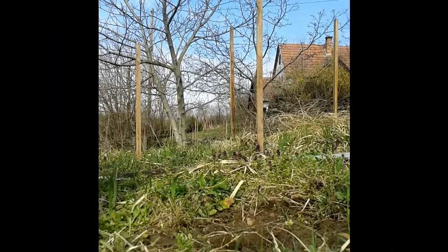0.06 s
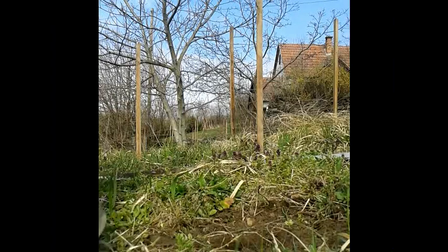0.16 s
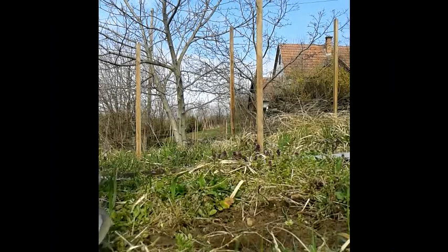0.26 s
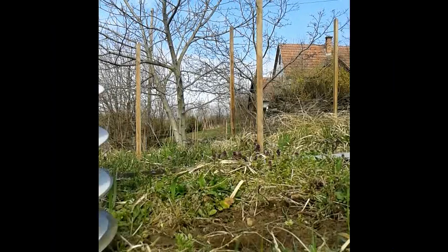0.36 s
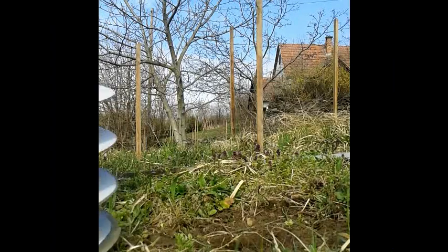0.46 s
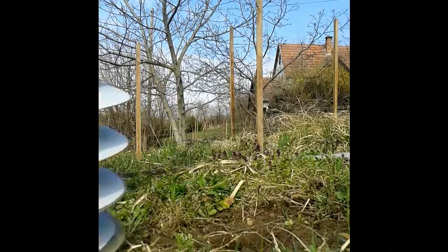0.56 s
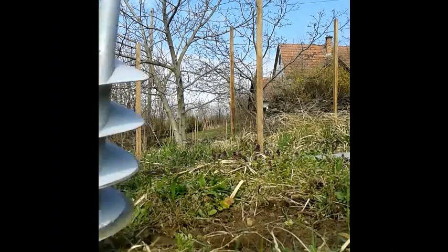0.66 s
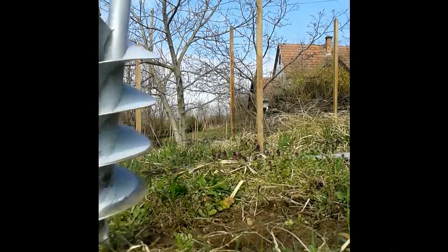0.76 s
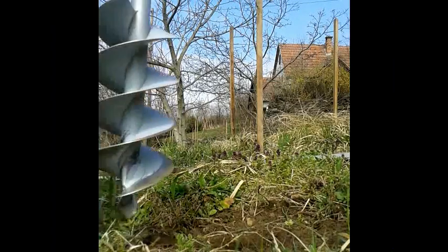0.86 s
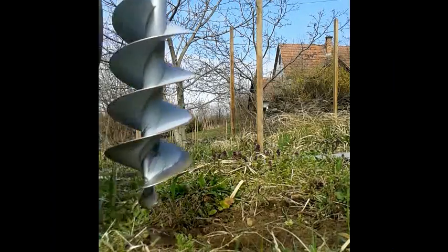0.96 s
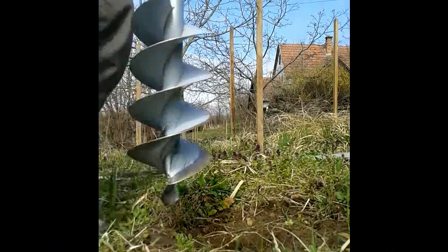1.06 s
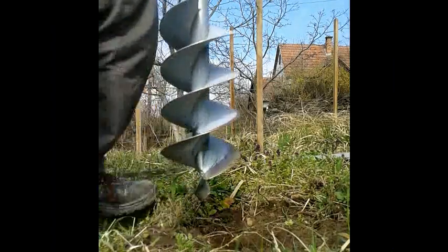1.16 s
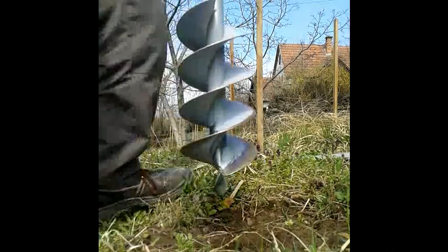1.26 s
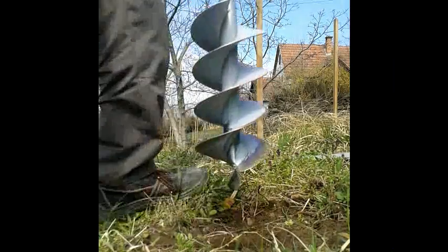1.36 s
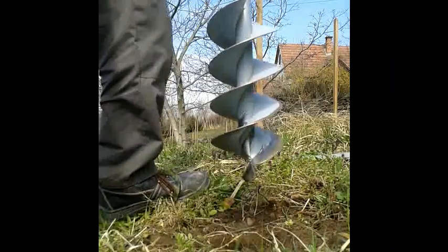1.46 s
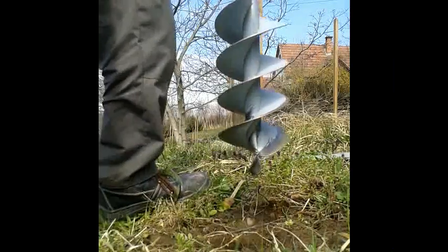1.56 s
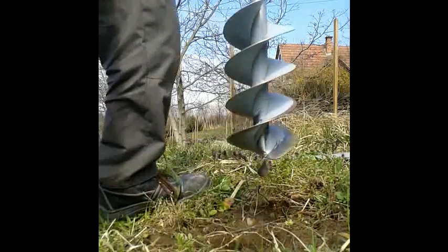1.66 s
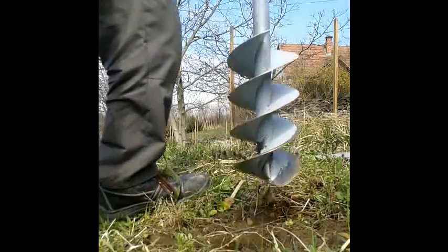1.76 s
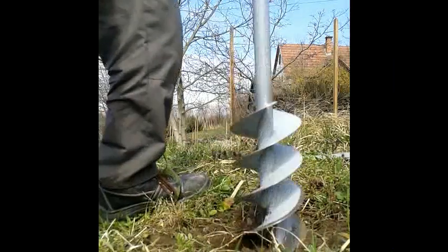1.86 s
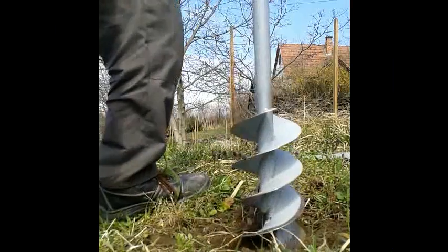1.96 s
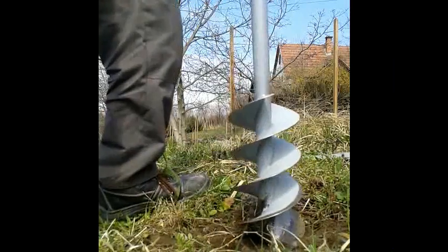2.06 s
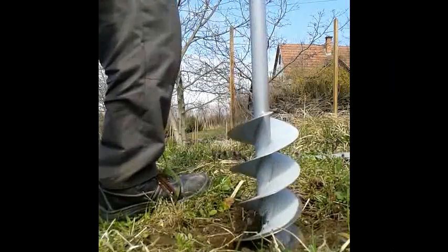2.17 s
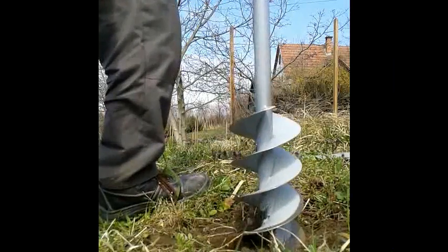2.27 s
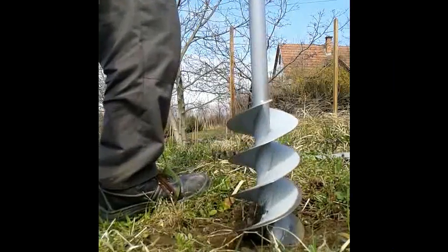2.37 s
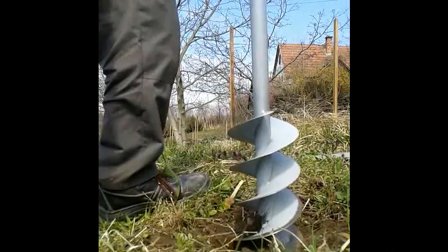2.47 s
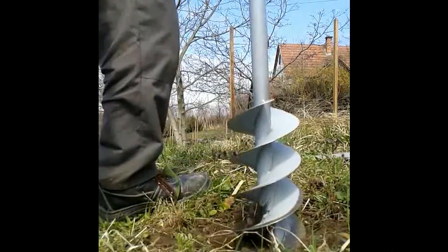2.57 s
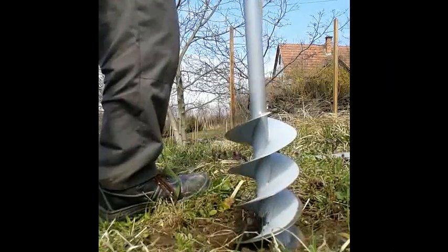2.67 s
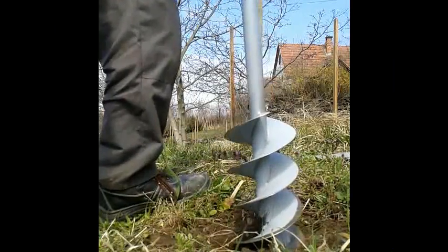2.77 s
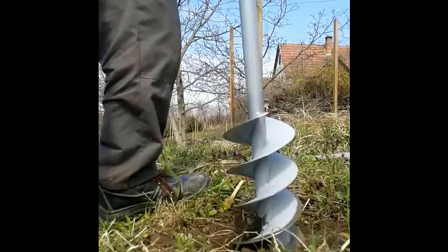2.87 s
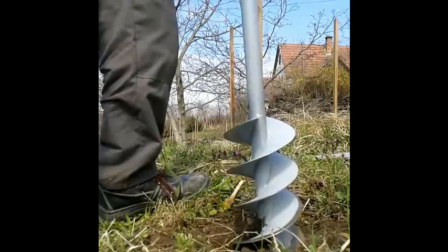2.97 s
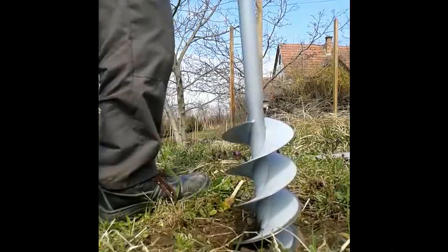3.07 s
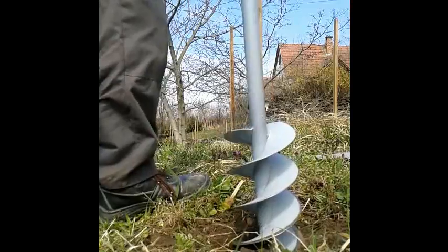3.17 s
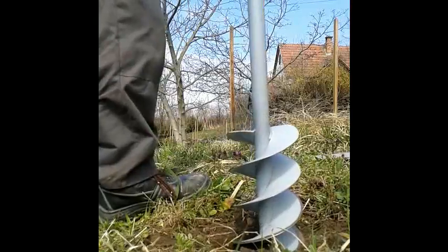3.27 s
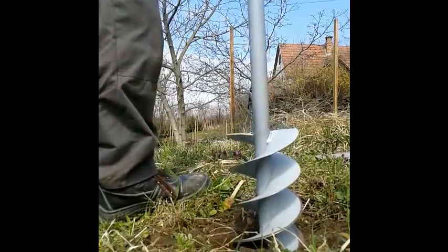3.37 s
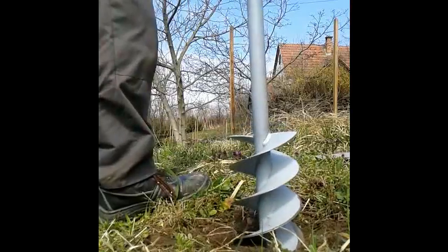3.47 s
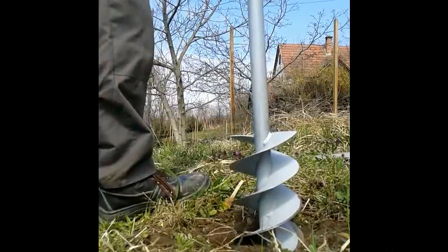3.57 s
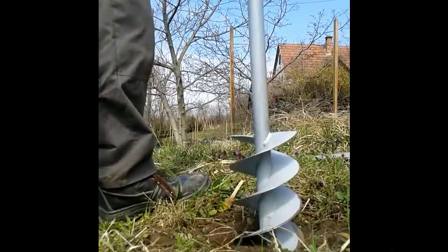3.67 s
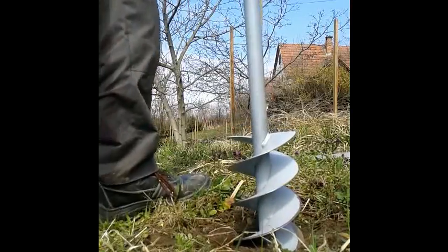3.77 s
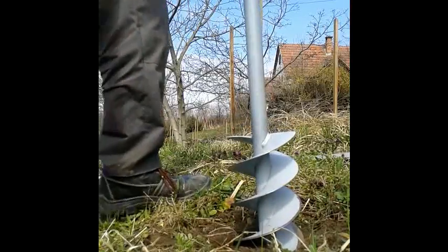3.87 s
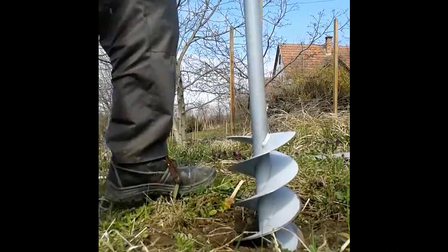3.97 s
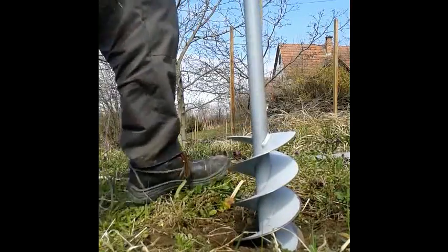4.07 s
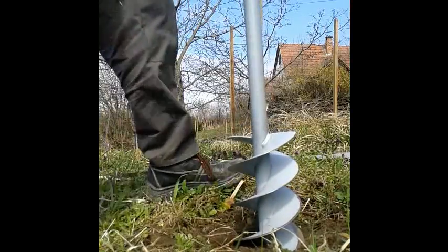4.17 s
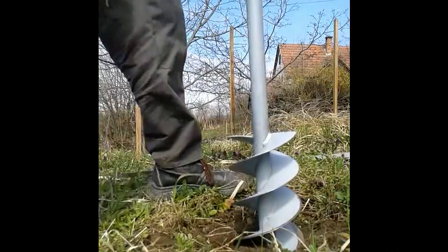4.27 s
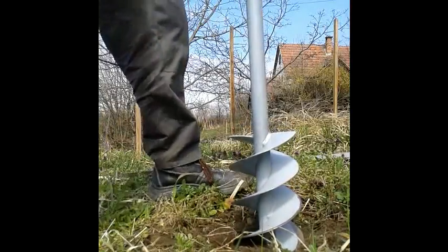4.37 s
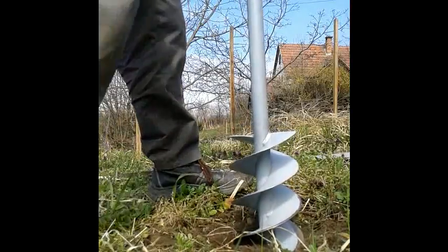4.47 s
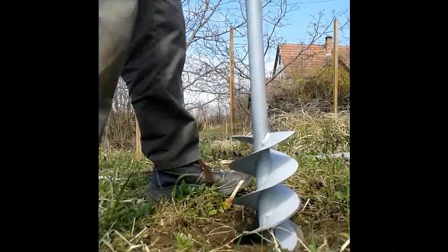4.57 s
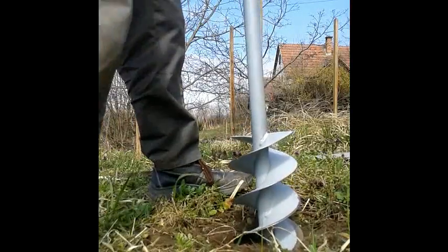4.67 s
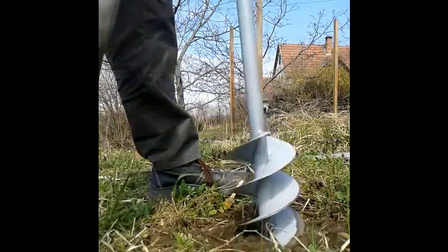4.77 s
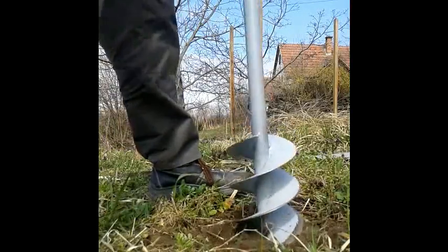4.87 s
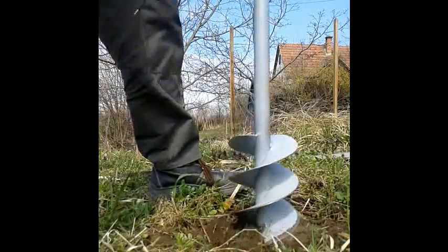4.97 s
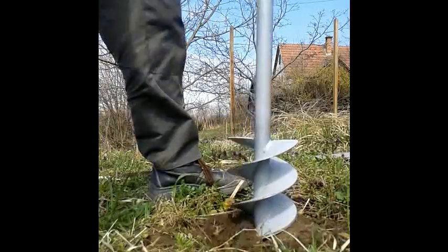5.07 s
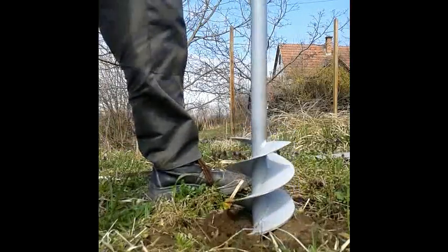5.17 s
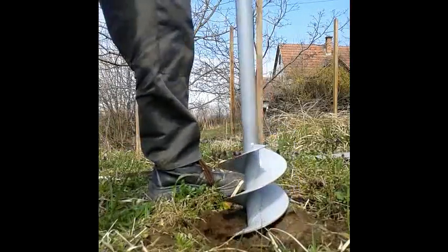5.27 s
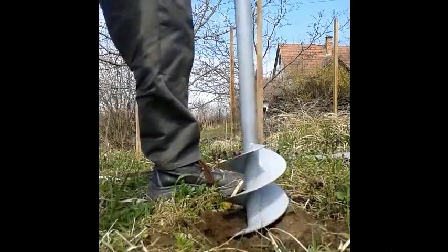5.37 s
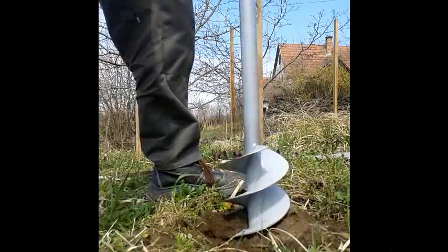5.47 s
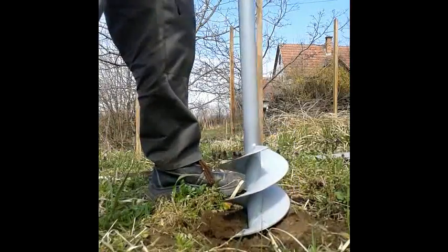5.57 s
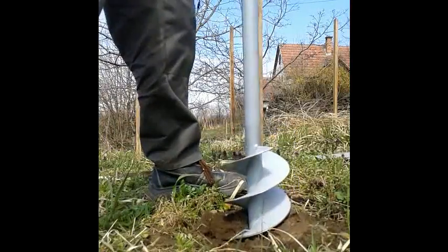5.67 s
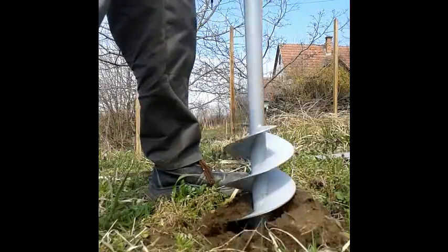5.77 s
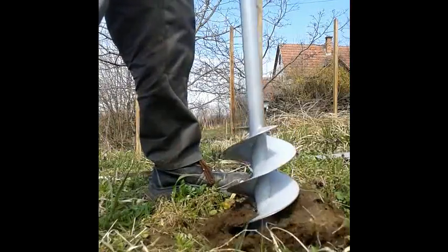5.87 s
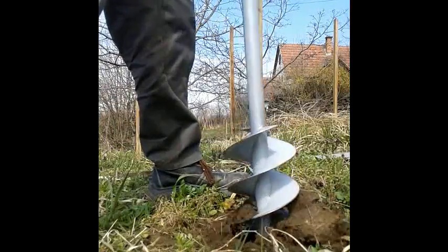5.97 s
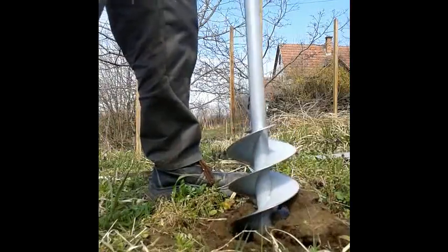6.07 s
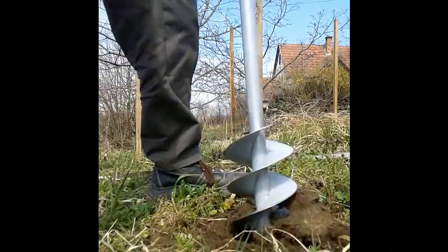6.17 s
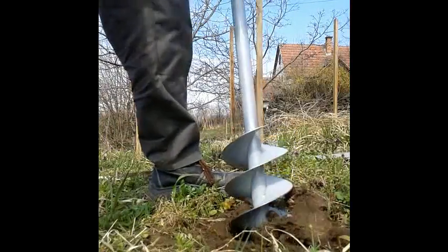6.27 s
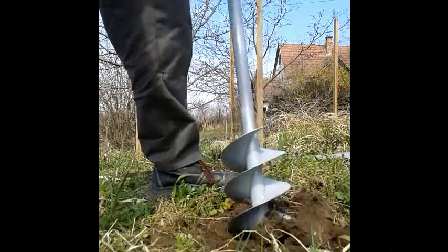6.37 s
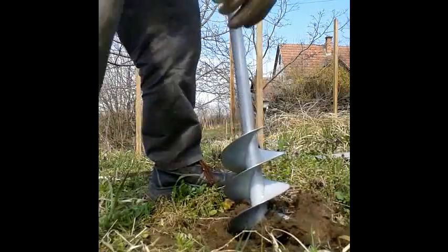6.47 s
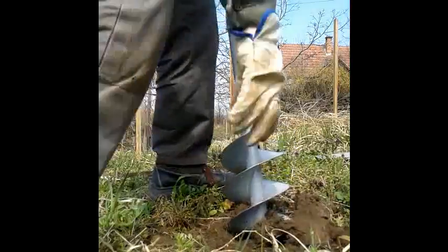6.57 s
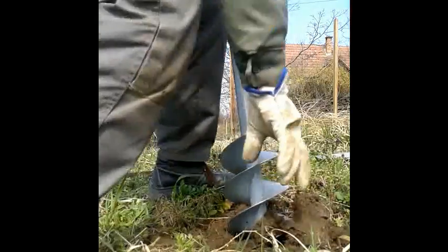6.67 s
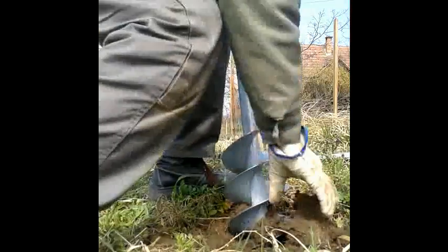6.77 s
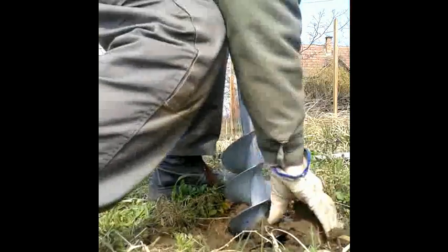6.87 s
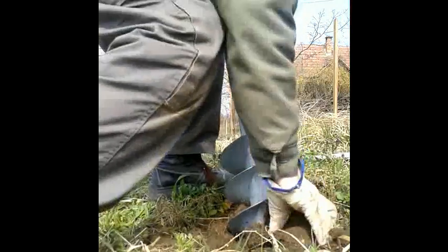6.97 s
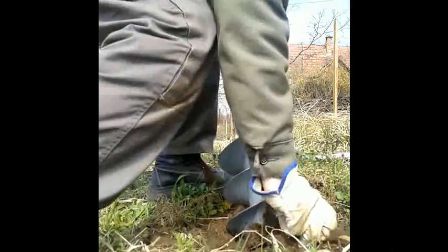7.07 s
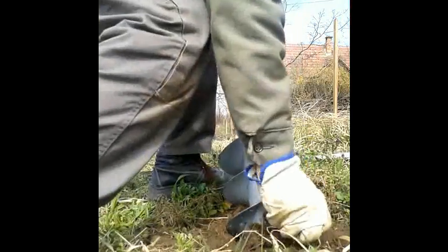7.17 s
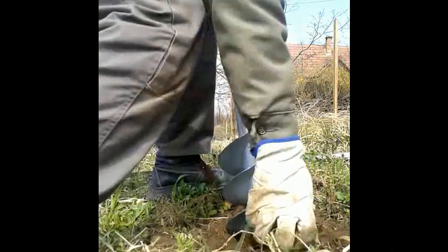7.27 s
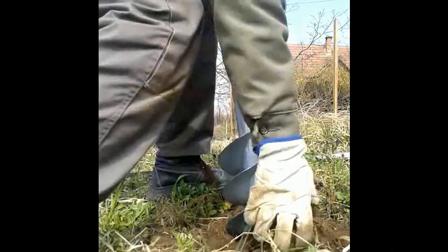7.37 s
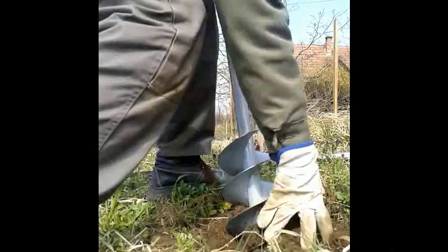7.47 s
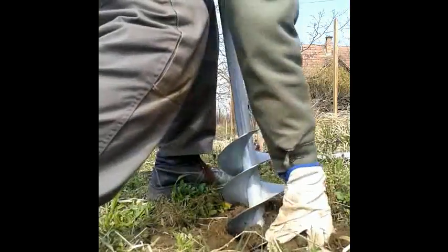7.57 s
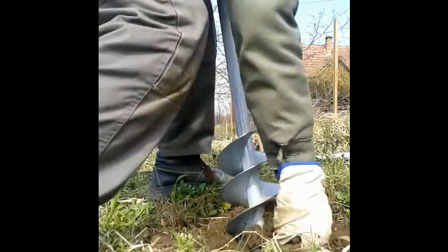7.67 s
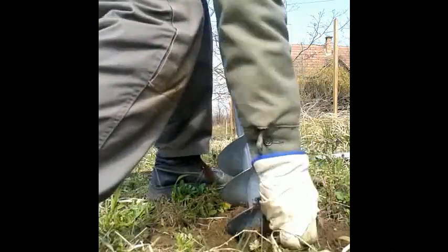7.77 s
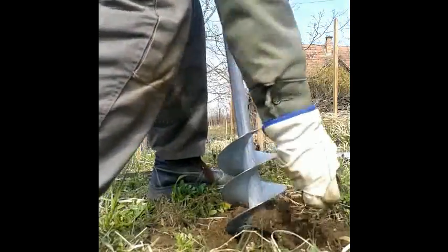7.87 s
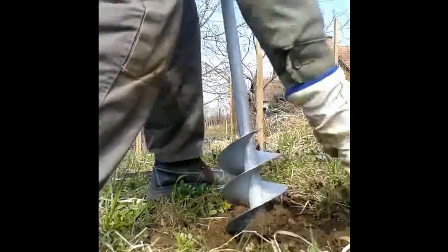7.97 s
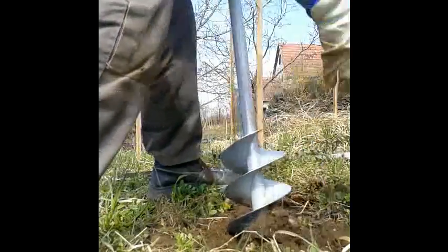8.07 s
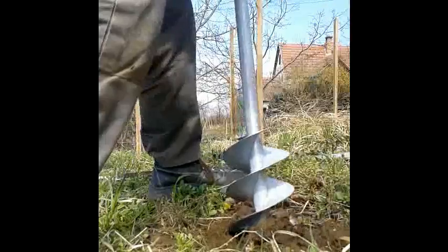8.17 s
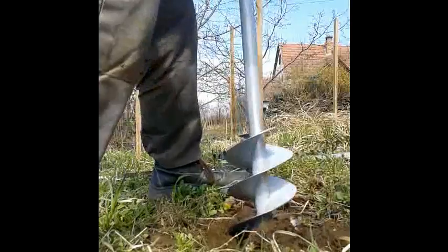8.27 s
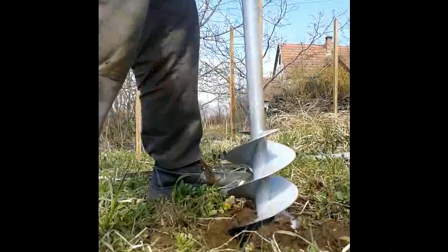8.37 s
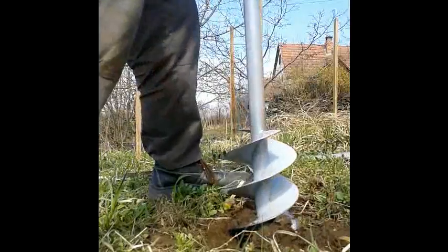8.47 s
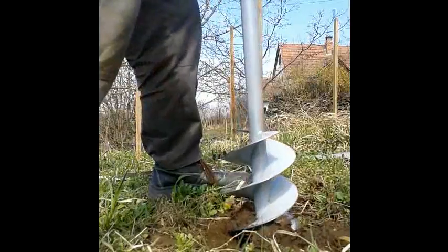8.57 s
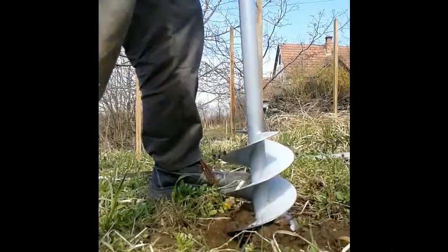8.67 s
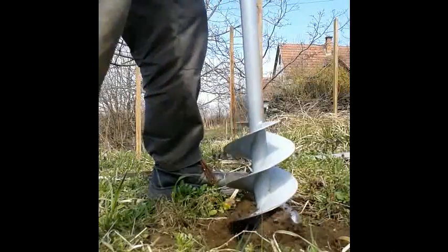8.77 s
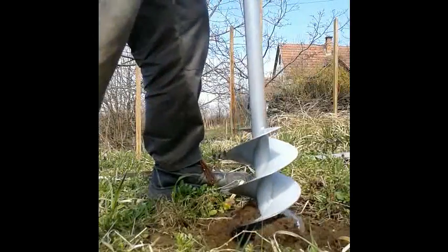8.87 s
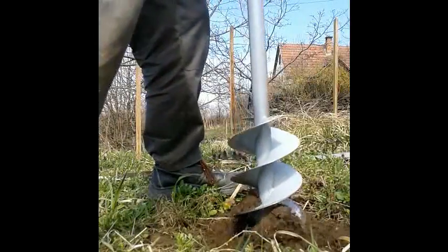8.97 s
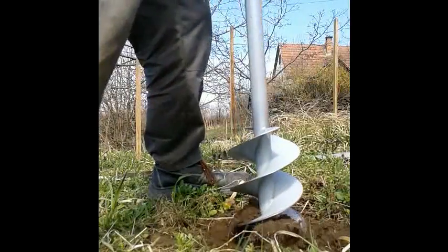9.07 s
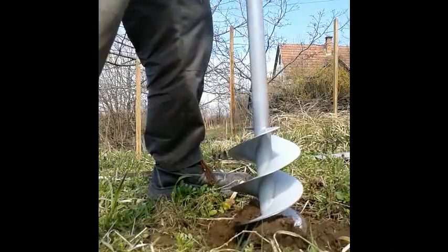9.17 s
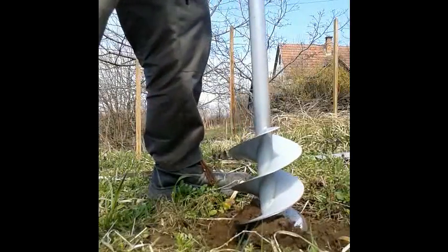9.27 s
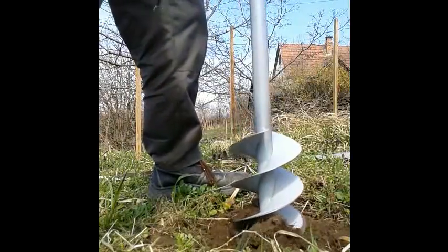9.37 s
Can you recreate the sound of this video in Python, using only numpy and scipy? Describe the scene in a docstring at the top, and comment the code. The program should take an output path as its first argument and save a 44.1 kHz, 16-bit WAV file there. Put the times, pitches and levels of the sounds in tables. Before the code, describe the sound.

Loud metallic clanks, then gritty twisting scrapes and snapping clods as a hand auger digs grassy earth, very close, with later soft sweeping and lighter knocks.

```python
"""A steel hand auger works in grassy soil, close to a phone on the ground in a quiet outdoor hush.
First clothes rustle and boots thud; then the auger clanks, rings and creaks, its hardest blows clipping.
Strokes of filtered grit scrape and crunch with snapping clods, and the boots thud again midway.
Later a glove sweeps loose soil away, and a few lighter knocks, a soft step and faint scrapes close it.
Noise bursts and decaying sines make the blows; coloured noise and random grains make the rest."""
import sys
import numpy as np
from scipy import signal
from scipy.fft import rfft, irfft
from scipy.io import wavfile
from scipy.ndimage import uniform_filter1d

SR = 44100
rng = np.random.default_rng(int(sys.argv[2]) if len(sys.argv) > 2 else 0)


def output_pcm(signal):
    """Save a mono or channel-first signal as 16-bit PCM at the path in sys.argv[1].

    Samples are clipped to [-1, 1] before scaling.
    """
    pcm = np.clip(np.atleast_2d(signal).T, -1, 1) * 32767
    wavfile.write(sys.argv[1], SR, np.round(pcm).astype(np.int16))


N = 415863  # samples in the scene
BLOW_S = 0.45  # room for one blow and its tail


def undb(db):
    """Decibels to gain."""
    return 10 ** (np.asarray(db) / 20)


def unit(x):
    """Scale to rms 1."""
    return x / np.sqrt(np.mean(x ** 2))


def colour(x, points):
    """Causal minimum-phase filter with the given (Hz, dB) outline."""
    size = 2048
    hz, db = np.transpose(points)
    bin_hz = np.arange(size // 2 + 1) * SR / size
    gain = undb(np.interp(np.log(bin_hz + 1), np.log(hz), db))
    # folding the cepstrum moves all of the response after time zero
    cepstrum = irfft(np.log(gain))
    cepstrum[1:size // 2] *= 2
    cepstrum[size // 2 + 1:] = 0
    response = irfft(np.exp(rfft(cepstrum)))
    return signal.fftconvolve(x, response)[:len(x)]


def soften(x, hz):
    """A soft contact passes only the lows."""
    lowpass = signal.butter(3, min(hz, SR / 4), fs=SR, output="sos")
    return signal.sosfilt(lowpass, x)


def walk(rate):
    """Smooth random wander with spread near 1, heading for a new value rate times a second."""
    hold = max(int(SR / rate), 2)
    steps_held = np.repeat(rng.standard_normal(N // hold + 1), hold)
    return unit(uniform_filter1d(steps_held, hold)[:N])


def grit(rate, spread_db):
    """Tiny fractures at random moments, rate a second on average, a few much larger than the rest."""
    size = undb(spread_db * np.minimum(rng.exponential(size=N), 5))
    fires = rng.random(N) < rate / SR
    return unit(fires * size * rng.standard_normal(N))


def contact(decay_s, rise_s=0.0029):
    """A rough touch: noise that bites quickly and dies away."""
    t = np.arange(int(BLOW_S * SR)) / SR
    envelope = (1 - np.exp(-t / rise_s)) * np.exp(-t / max(decay_s, 1 / SR))
    return rng.standard_normal(len(t)) * envelope


def blow(x, decay_s):
    """Give x the energy of a burst that starts at rms 1 and decays in decay_s."""
    return x * np.sqrt(abs(decay_s) * SR / 2 / np.sum(x ** 2))


def modes_struck(modes, scatter_db):
    """Decaying modes after one tap; each point of contact weights them differently."""
    t = np.arange(int(BLOW_S * SR)) / SR
    hz, db, t60 = np.transpose(modes)[:, :, None]
    sign = rng.choice([-1, 1], hz.shape)
    weights = undb(db + scatter_db * rng.standard_normal(hz.shape)) * sign
    # a weaker twin beats against each mode
    twin_hz = hz * (1 + 0.005 * rng.standard_normal(hz.shape))
    waves = np.sin(2 * np.pi * hz * t) + 0.5 * np.sin(2 * np.pi * twin_hz * t)
    decay = np.exp(-np.log(1000) * t / t60)
    return np.sum(weights * decay * waves, axis=0)


def ring(x, modes, scatter_db):
    """Drive the modes with x."""
    return signal.fftconvolve(x, modes_struck(modes, scatter_db))[:len(x)]


def thump(decay_s, soft_hz):
    """The tip lands or breaks through, and the earth answers with a dead thump."""
    dull = soften(contact(decay_s), soft_hz)
    return blow(colour(dull, [(25, -16.0), (80, 1.5)]), decay_s)


def add(out, s, x):
    """Mix x into out from time s."""
    i = int(s * SR)
    out[i:i + len(x)] += x[:N - i]


# Tone of the outdoor hush. Each row: frequency in Hz, density in dB per Hz.
HUSH_TONE = [(15, -27), (25, 0), (150, -7.5), (219, -10), (309, -11.5), (363, -11.5), (637, -19),
             (1670, -18.5), (3730, -26), (7480, -16.5), (9520, -24), (12100, -28.5), (15000, -36)]
HUSH_DB = -53


def hush():
    """Still outdoor air: low-heavy noise whose level slowly swells and sinks."""
    air = unit(colour(rng.standard_normal(N), HUSH_TONE))
    return undb(HUSH_DB + 1.3 * walk(2.0)) * air


# Tone of brushing cloth and grass. Each row: frequency in Hz, density in dB per Hz.
RUSTLE_TONE = [(100, -14), (400, -4), (900, -2), (2000, -0.5), (3800, -4), (6000, -1.5), (10000, -1.5),
               (13000, -10), (16000, -17.5)]


def rustle(cloth):
    """Work clothes and dry grass brush: dense fibre ticks blur into a broad, soft hiss."""
    flutter_db = 1.2 * walk(60) + 1.0 * walk(12)
    fibres = grit(rate=12000, spread_db=0.6) * cloth * undb(flutter_db)
    return np.std(fibres) * unit(colour(fibres, RUSTLE_TONE))


# Boots on the turf. Each row: start in seconds, level in dB, contact decay in seconds,
# deep thud against the tap in dB, softness cut-off in Hz.
BOOT_STEPS = [(0.525, -50, 0.024, -25, 450), (0.584, -44.5, 0.074, -25, 446), (0.719, -48, 0.039, -22, 450),
              (0.769, -37, 0.017, -35, 700), (0.922, -39.5, 0.06, -23, 477), (.95, -31, .04, -24, 700),
              (.977, -14.5, 0.018, -14, 1120), (1.013, -24.5, 0.021, -23, 596),
              (1.114, -45.5, 0.065, -25, 395), (4.419, -43, 0.03, -13.5, 450),
              (4.472, -34.5, 0.025, -10, 1100), (4.61, -23, 0.018, 2.5, 600), (4.66, -21, 0.014, -23, 590),
              (8.59, -54, 0.048, -22, 900)]
# The ground and the phone standing on it. Each row: mode in Hz, level in dB, t60 in seconds.
GROUND_MODES = [(140.5, -9, 0.2), (268.6, -1.5, 0.13), (337, 2, .13), (449, -1, 0.063), (710, 5.5, 0.039),
                (784, -6.5, .12)]
# Tone of the heel's deep thud. Each row: frequency in Hz, gain in dB.
HEEL_TONE = [(25, -1), (55, -3), (90, 3), (150, -6), (400, -68), (1500, -49)]


def steps():
    """A boot taps and rolls on the turf, shaking the ground under the phone; the heel adds a deep thud."""
    out = np.zeros(N)
    for s, db, decay_s, heel_db, soft_hz in BOOT_STEPS:
        touch = contact(decay_s)
        tap = unit(modes_struck(GROUND_MODES, scatter_db=0.5))
        roll = unit(ring(touch, GROUND_MODES, scatter_db=0.5))
        shake = blow(soften(tap + undb(-4) * roll, soft_hz), decay_s)
        heel = blow(colour(touch, HEEL_TONE), decay_s)
        add(out, s, undb(db) * (shake + undb(heel_db) * heel))
    return out


# Clods, stones and stalks cracking. Each row: start in seconds, level in dB, dull against bright in dB,
# decay in seconds, ground thump in dB.
SOIL_CRACKS = [(0.468, -26.5, 14, 0.0017, -60), (1.335, -32, -15, 0.0067, -33.5),
               (1.349, -38, 0, .008, -33), (1.369, -29.5, -1, .008, -31.5), (2.172, -35, -5, 0.026, -60),
               (3.229, -26, 13, 0.0034, -53), (3.389, -28.5, 9, 0.0041, -54), (4.231, -30, 14, 0.0015, -33),
               (4.792, -31, 0, .005, -34.5), (4.89, -29.5, -10, .015, -55), (5.041, -28, 8, .012, -42),
               (5.076, -30, 9, .005, -30), (5.115, -24, 3, 0.027, -41), (5.1447, -18.5, 1, 0.025, -24),
               (5.21, -22, 12, 0.0093, -24), (5.226, -22, 9, 0.0066, -22.5),
               (5.25, -21.5, -3.5, 0.011, -32), (5.679, -23, -4, .002, -38.5), (5.961, -32, 4, 0.0043, -52),
               (6.194, -25.5, -1, 0.003, -56), (6.901, -39, 16, 0.0045, -54),
               (7.102, -28, -10, 0.0064, -61), (7.171, -35, 9, .0048, -53), (8.577, -39, -2, .005, -52),
               (9.061, -34, -19, .0015, -63), (9.087, -31, -18, 0.011, -51), (9.355, -33, 10, 0.0036, -35)]
# Dull tone of a breaking clod. Each row: frequency in Hz, density in dB per Hz.
CLOD_TONE = [(150, -52), (500, -1), (850, 2), (1150, 10), (1550, 11), (2200, -1.5), (3100, -14.5),
             (4000, -26), (7000, -40)]
CLOD_THUMP_S, CLOD_THUMP_HZ = 0.0042, 637


def cracks():
    """Clods and stalks give way with a short snap, dull or bright, and jolt the ground."""
    out = np.zeros(N)
    for s, db, dull_db, decay_s, thump_db in SOIL_CRACKS:
        touch = contact(decay_s, rise_s=0.00016)
        dull = unit(colour(touch, CLOD_TONE))
        bright = unit(colour(touch, SCRAPE_TONE))
        snap = blow(undb(dull_db) * dull + bright, decay_s)
        jolt = thump(CLOD_THUMP_S, CLOD_THUMP_HZ)
        add(out, s, undb(db) * snap + undb(thump_db) * jolt)
    return out


# Pushes and twists of the auger. Each row: start in seconds, length in seconds, blade scrape in dB,
# swell over the stroke in dB, soil crunch against scrape in dB.
AUGER_STROKES = [(1.256, 0.11, -38, 3, -10.5), (2.018, 0.056, -52, 5, -11), (2.073, .03, -39, 4.5, -6.5),
                 (2.302, .03, -41.5, 2.5, -8.5), (2.54, .05, -47, -3, -5), (2.79, 0.048, -41.5, -4, -10.5),
                 (2.953, 0.2, -34.5, 9, -9), (3.138, 0.26, -36, -1.5, -10), (3.37, .095, -32.5, 0.5, -8),
                 (3.555, 0.049, -47, -1, -11), (4.004, 0.23, -42, 7.5, -13.5), (4.23, .33, -48.5, -6, -7.5),
                 (4.593, .29, -39, 3.5, -7.5), (4.88, .068, -31, -6.5, -1), (4.955, .15, -35.5, 1.5, -10),
                 (5.1, 0.17, -29.5, 0, -6.5), (5.427, .035, -52.5, 2, -5), (5.658, 0.064, -37, 0, -4.5),
                 (5.769, 0.056, -42.5, 0, -7), (5.853, .12, -43.5, 0.5, -6.5), (6.042, 0.16, -43, 8, -8.5),
                 (6.343, 0.054, -45.5, 2.5, -6), (6.411, 0.18, -47.5, -8, -13.5),
                 (8.563, 0.061, -38, -9, -5.5), (8.64, .22, -51, -2, -8),
                 (8.974, 0.034, -42.5, -0.5, -12.5), (9.147, 0.13, -49, 11, -12.5),
                 (9.304, .13, -42.5, 6, 3)]
# A glove sweeps loose soil from the hole. Each row: start in seconds, length in seconds, scrape in dB,
# swell over the stroke in dB, soil crunch against scrape in dB.
GLOVE_SWEEPS = [(6.665, 0.39, -56.5, -1, 0), (7.023, .09, -47.5, 7, -4.5), (7.13, 0.18, -57, -10, 0),
                (7.556, 0.096, -46.5, 4.5, -3.5), (7.681, .03, -43.5, -4, -6), (7.947, 0.018, -51, 1.5, -4)]
# Leg and arm movements. Each row: middle in seconds, half length in seconds, cloth rustle in dB.
BODY_MOVES = [(.05, .08, -47.5), (0.193, .028, -37.5), (0.307, .05, -46.5), (0.46, .09, -47.5),
              (0.739, .06, -40), (0.961, 0.02, -31), (1.08, .07, -49), (1.346, .035, -41),
              (1.468, .08, -55.5), (3.3, 0.19, -43.5), (4.212, 0.021, -38.5), (4.481, .11, -45.5),
              (4.61, .017, -31), (4.884, .16, -42), (5.205, 0.055, -35.5), (6.482, 0.22, -48.5),
              (6.692, 0.46, -51), (8.233, 0.062, -42), (8.51, 0.38, -51.5), (9.4, 0.087, -50)]
BITE_S, BITE_SHARE, LET_GO_S = 0.019, 0.12, 0.019  # a long stroke takes a share of its length more to bite
TRICKLE_DB, TRICKLE_S = -15, 0.067
IDLE_SCRAPE_DB, IDLE_CRUNCH_DB = -65, -72.5  # grains that keep shifting between strokes
GRASS_DB = -9  # dry grass hisses along with each movement, against the cloth


def stroke(s, length_s, swell_db):
    """Gain of one stroke: it bites, swells or eases while held, lets go, and soil trickles after it."""
    t = np.arange(N) / SR - s
    after = np.maximum(t - length_s, 0)
    bite = np.clip(t / (BITE_S + BITE_SHARE * length_s), 0, 1)
    swell = undb(swell_db * (np.clip(t / length_s, 0, 1) - 0.5))
    trickle = undb(TRICKLE_DB)
    release = (1 - trickle) * np.exp(-after / LET_GO_S) + trickle * np.exp(-after / TRICKLE_S)
    return bite * swell * release


def effort():
    """Gains of scrape, crunch and rustle: the powers of all strokes and movements add up."""
    t = np.arange(N) / SR
    cloth = sum(undb(db) ** 2 / (1 + ((t - s) / half_s) ** 2) ** 2 for s, half_s, db in BODY_MOVES)
    scrape = undb(IDLE_SCRAPE_DB) ** 2 + undb(GRASS_DB) ** 2 * cloth
    crunch = undb(IDLE_CRUNCH_DB) ** 2
    for s, length_s, db, swell_db, crunch_db in AUGER_STROKES + GLOVE_SWEEPS:
        power = (undb(db) * stroke(s, length_s, swell_db)) ** 2
        scrape = scrape + power
        crunch = crunch + undb(crunch_db) ** 2 * power
    return np.sqrt(scrape), np.sqrt(crunch), np.sqrt(cloth)


# Tone of grit on the blade, and of a bright snap. Each row: frequency in Hz, density in dB per Hz.
SCRAPE_TONE = [(2500, -41.5), (3900, -27.5), (4600, -5.5), (5700, 0), (9000, -0.5), (10500, -8.5),
               (11700, -17), (12800, -21.5), (16000, -23)]
# Tone of crumbling soil. Each row: frequency in Hz, density in dB per Hz.
CRUNCH_TONE = [(60, -15.5), (200, -13), (450, -16.5), (650, -7.5), (850, -15), (1080, 1), (1500, -3),
               (2000, -5), (3100, -7.5), (3800, -24), (6000, -47.5)]


def digging(scrape, crunch):
    """Sand hisses over the blade and makes it sing faintly while the soil crumbles in uneven slips."""
    slip_db = 1.3 * walk(45) + 1.0 * walk(14)
    sand = grit(rate=9100, spread_db=0.5) * scrape * undb(slip_db)
    crumbs = grit(rate=2200, spread_db=2.0) * crunch * undb(slip_db + 1.3 * walk(70))
    hiss = colour(sand, SCRAPE_TONE)
    singing = unit(ring(hiss, STEEL_MODES, scatter_db=2.0))
    blade = unit(unit(hiss) + undb(-6.5) * singing)
    return np.std(sand) * blade + np.std(crumbs) * unit(colour(crumbs, CRUNCH_TONE))


# The shaft creaks as it is turned back. Each row: start in seconds, level in dB, duration in seconds.
SHAFT_CREAKS = [(2.041, -47.5, 0.13), (2.311, -38, 0.019), (2.543, -44, 0.075), (5.766, -52, 0.071),
                (8.807, -51, 0.065), (8.98, -42.5, 0.076), (9.302, -43.5, 0.14)]
# Resonances of the creak. Each row: mode in Hz, level in dB, t60 in seconds.
CREAK_MODES = [(1006, -15.5, 0.12), (1350, 0.5, .03), (1470, -5, 0.011), (1650, -14, 0.063)]


def creaks():
    """Quick stick-slip ticks swell and fade in the resonances of the shaft."""
    out = np.zeros(N)
    slips = grit(rate=1000, spread_db=1)
    for s, db, length_s in SHAFT_CREAKS:
        i, n = int(s * SR), int(length_s * SR)
        ticks = slips[i:i + n] * np.hanning(n)[:N - i]
        drive = np.pad(ticks, (0, SR // 10))  # room to ring on
        add(out, s, undb(db) * blow(ring(drive, CREAK_MODES, scatter_db=2.0), length_s))
    return out


def jangle(decay_s, count=90):
    """A crowd of short-lived bending modes of the sheet steel, new at every blow."""
    t = np.arange(int(BLOW_S * SR / 3)) / SR
    place, phase, life = rng.random((3, count, 1))
    hz = 1200 + 14500 * (np.arange(count)[:, None] + place) / count
    life_s = abs(decay_s) * (0.5 + life) * (5000 / hz) ** 0.69  # high modes die sooner
    crowd = np.exp(-t / life_s) * np.sin(2 * np.pi * (hz * t + phase))
    return np.pad(crowd.sum(axis=0), (0, int(BLOW_S * SR) - len(t)))


# The steel shaft and spiral blade. Each row: mode in Hz, level in dB, t60 in seconds when free of soil.
STEEL_MODES = [(587, -8, .03), (1020, 0, .03), (1355, -7, .05), (1930, -7, .05), (2190, -6, .06),
               (2850, -18, .1), (3190, -16, .05), (4441, -20, .33), (4576, -20, .18), (4640, -23, .22),
               (4730, -19, .34), (4845, -16, .1), (4953, -7, .1), (5150, -5, .12), (5285, -4, .11),
               (5520, -2, .065), (5880, -5, .055), (6070, -8, .14), (6480, -2, .05), (6570, -6, .13),
               (7180, -3, .055), (7430, -4, .055), (7720, -6, .06), (8130, -2, .055), (8520, -4, .05),
               (8890, 0, .05), (10120, -9, .045)]
# Soil packed round the blade damps its ring and holds its lowest modes. Each row: time in seconds,
# added damping in dB per second, lowest free frequency in Hz.
SOIL_BURIAL = [(1.9, 15, 329), (2.7, 45, 680), (5.9, 403, 1480), (8.9, 185, 1430)]
# Tone of the bright clash. Each row: frequency in Hz, gain in dB.
CLASH_TONE = [(2400, -22), (3000, -12), (3900, -18.5), (5200, -4), (8000, 1), (9500, -5), (11500, -16),
              (16000, -28.5)]
# Tone of the dull knock. Each row: frequency in Hz, gain in dB.
KNOCK_TONE = [(100, -27), (350, -34.5), (590, -2.5), (830, -14.5), (1020, -1.5), (1200, -4), (1650, -5.5),
              (2300, -10.5), (3200, -21.5), (6000, -46)]


def strike(s, decay_s, knock_db, ring_db, bite_s=0.0025):
    """One contact of the steel at time s: a bright clash, a dull knock and the ring of the blade."""
    bite = 1 - np.exp(-np.arange(int(BLOW_S * SR)) / SR / bite_s)
    touch = contact(decay_s)
    when, dampings, lowest = np.transpose(SOIL_BURIAL)
    damping = np.interp(s, when, dampings)
    modes = [(hz, mode_db, 1 / (1 / t60 + damping / 60)) for hz, mode_db, t60 in STEEL_MODES]
    held = signal.butter(2, np.interp(s, when, lowest), "highpass", fs=SR, output="sos")
    tone = signal.sosfilt(held, bite * modes_struck(modes, scatter_db=2.5))
    clash = colour(unit(bite * jangle(decay_s)) + undb(-7.5) * unit(touch), CLASH_TONE)
    # the blow also drives the low modes of the shaft
    rough_knock = unit(signal.sosfilt(held, colour(touch, KNOCK_TONE)))
    knock = rough_knock + undb(-10.0) * unit(colour(tone, KNOCK_TONE))
    dull_and_ring = undb(knock_db) * blow(knock, decay_s) + undb(ring_db) * blow(tone, decay_s)
    return blow(clash, decay_s) + dull_and_ring


# Steel knocks. Each row: start in seconds, level in dB, contact decay in seconds,
# dull knock against bright clash in dB, ring against clash in dB, graze before the blow in seconds,
# rebound after it in seconds, rebound against blow in dB, dull knock of the rebound against its clash in dB,
# ground thump in dB, thump cut-off in Hz.
STEEL_CLANKS = [(1.909, 3, 0.0059, -33, -1.5, 0.0057, .008, -8, 6, -36, 149),
                (2.199, -8.5, 0.0076, 0, 2.5, 0.011, 0.013, -27, 0, -28, 68),
                (2.4376, 2, 0.0083, -12.5, -2, 0.0096, .02, -24, -16, -30, 67.5),
                (2.6576, -6, 0.0079, -5, -2, 0.011, .014, -27, -19, -31.5, 71),
                (5.928, -21.5, 0.0094, -4.5, -4.5, .012, 0.013, -7, 8, -52, 400),
                (7.76, -14, 0.0068, -17, -6.5, 0.01, .008, -6, -6, -44.5, 606),
                (8.885, -7.5, 0.0042, -10, -1.5, 0.0092, 0.018, -12, -9, -32.5, 423),
                (9.101, -21, 0.014, -7.5, -6, 0.02, 0.0087, -2.5, -8.5, -29.5, 220)]
GRAZE_DB, GRAZE_DECAY_S, GRAZE_KNOCK_DB = -20, 0.01, -11  # the edge grazes just before each blow lands
STEEL_THUMP_S = 0.014  # decay of the earth's thump, longer than under a breaking clod


def clanks():
    """Each knock is a light graze, the blow itself with a thump in the ground, and one rebound."""
    out = np.zeros(N)
    for (s, db, decay_s, knock_db, ring_db, graze_s, rebound_s, rebound_db,
         rebound_knock_db, thump_db, thump_hz) in STEEL_CLANKS:
        graze = strike(s, GRAZE_DECAY_S, GRAZE_KNOCK_DB, ring_db)
        main_blow = strike(s, decay_s, knock_db, ring_db)
        rebound = strike(s, decay_s, rebound_knock_db, ring_db)
        add(out, s - graze_s, undb(db + GRAZE_DB) * graze)
        add(out, s, undb(db) * main_blow)
        add(out, s, undb(thump_db) * thump(STEEL_THUMP_S, thump_hz))
        add(out, s + rebound_s, undb(db + rebound_db) * rebound)
    return out


def scene():
    """All sources at the one microphone, in the open with no echo."""
    scrape, crunch, cloth = effort()
    background = hush() + rustle(cloth) + steps()
    auger = cracks() + digging(scrape, crunch) + creaks() + clanks()
    return (background + auger)[None]


def record(dry):
    """The phone clips at full scale and cuts the top with a steep low-pass."""
    clipped = np.clip(dry, -1, 1)
    top_hz = 15800
    lowpass = signal.ellip(10, 0.2, 80, top_hz, fs=SR, output="sos")
    return signal.sosfilt(lowpass, clipped)


dry = scene()
out = record(dry)
output_pcm(out)
```